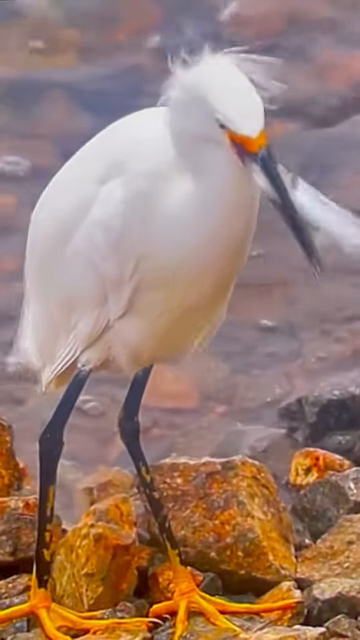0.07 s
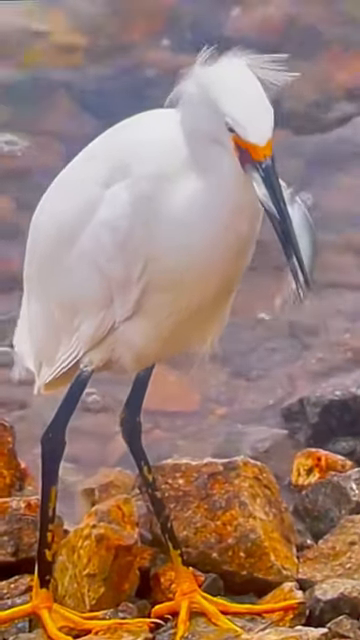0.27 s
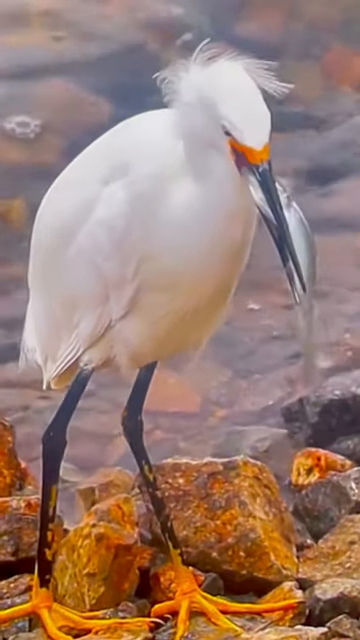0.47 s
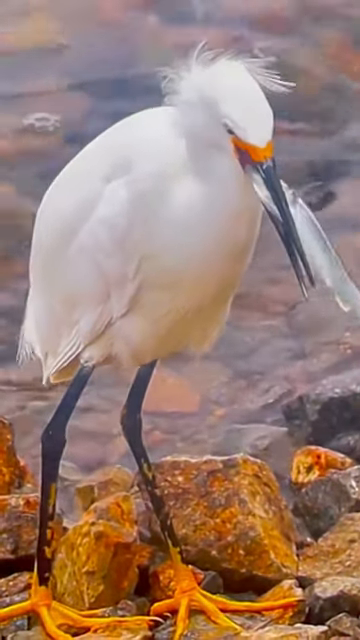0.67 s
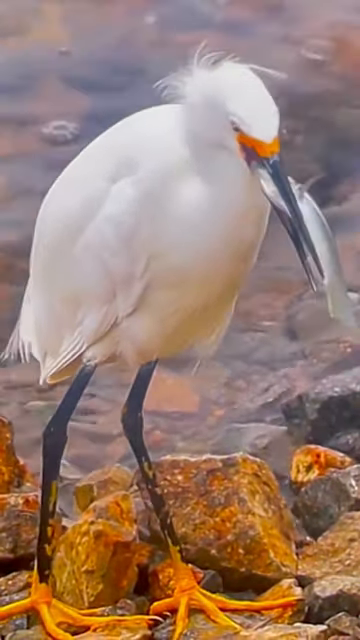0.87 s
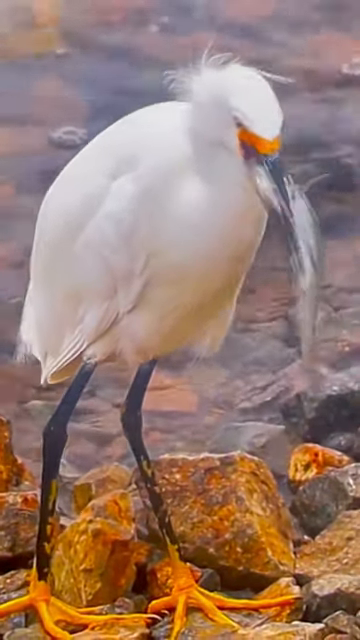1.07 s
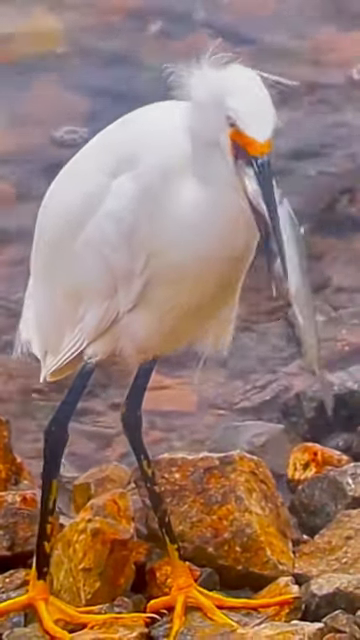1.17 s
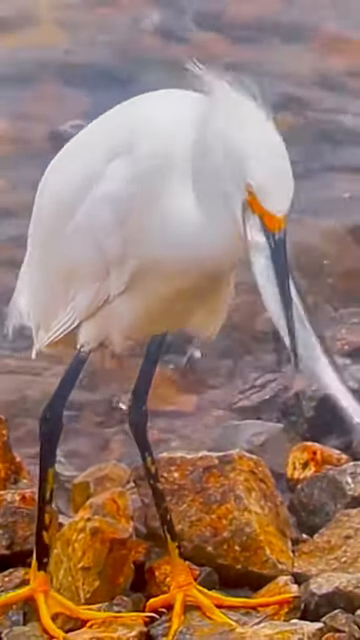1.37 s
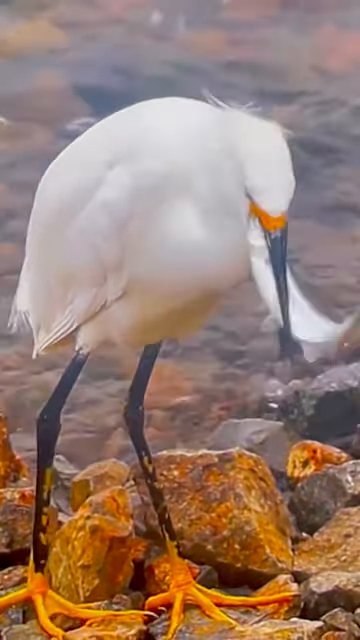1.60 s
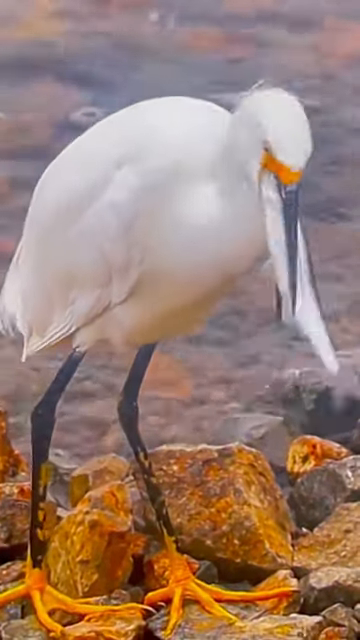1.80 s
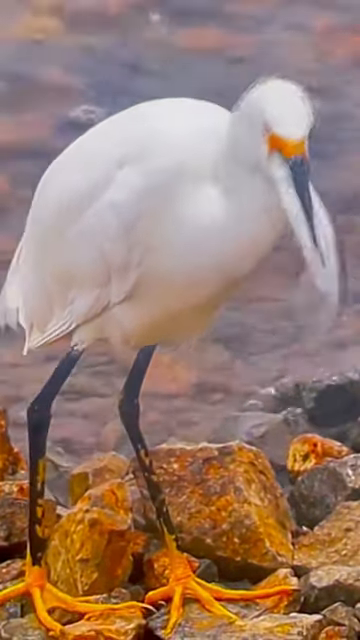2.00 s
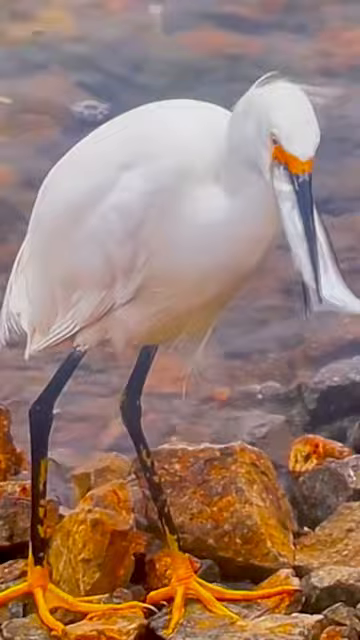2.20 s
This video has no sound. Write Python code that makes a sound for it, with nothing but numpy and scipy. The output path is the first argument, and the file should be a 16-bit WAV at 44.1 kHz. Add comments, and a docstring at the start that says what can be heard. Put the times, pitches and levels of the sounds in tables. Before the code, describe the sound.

One brief, raspy egret croak, with ripples splashing softly along a rocky shore.

```python
"""Ripples wash and splash over stones at a rocky water's edge, with faint wind on the microphones.
An egret gives one short, harsh croak: uneven pulses and puffs of air ring its throat, and the rocks
scatter a faint echo. The recorder's gain control ducks the wash's midrange after the croak, then lets
it recover. Its stereo processing widens one sound, putting parts of the treble out of phase."""
import sys
import numpy as np
from scipy import signal
from scipy.fft import rfft, irfft
from scipy.io import wavfile
from scipy.ndimage import uniform_filter1d, map_coordinates

SR = 44100
rng = np.random.default_rng(int(sys.argv[2]) if len(sys.argv) > 2 else 0)


def store_pcm(level_fs):
    """Save levels as 16-bit WAV."""
    pcm = np.round(np.clip(level_fs, -1, 1) * 32767).astype(np.int16)
    wavfile.write(sys.argv[1], SR, np.atleast_2d(pcm).T)


N = 99225

# spectrum of the wash on the stones: f/Hz, relative level/dB
WASH_SPECTRUM = [(30, -22.5), (200, -25), (350, -13.5), (570, -10.5), (740, -16.5), (950, -3.5),
                 (1100, 0.5), (1400, -6), (1800, -0.5), (2050, -6.5), (2400, -18), (2900, -20.5),
                 (3400, -16.5), (3850, -31), (4600, -30), (5050, -42), (5550, -25), (6100, -23),
                 (7000, -31.5), (8200, -26), (8650, -38), (9400, -29.5), (10050, -29.5), (10500, -28),
                 (11400, -31.5), (12200, -56)]
# the wash's midrange as the recorder's gain control ducks it and lets it recover: t/s, level/dB
WASH_DUCKING = [(0, -33), (.22, -33.5), (.45, -46.5), (.52, -43), (.72, -44), (.8, -39), (1.1, -37.5),
                (1.45, -36), (1.55, -34.5), (1.77, -34), (1.88, -34.5), (2.25, -34)]
# edge below which the wash thins out: t/s, f/Hz
WASH_LOW_EDGE = [(0, 30), (1.62, 40), (1.78, 300), (1.92, 304), (2.03, 503), (2.15, 670), (2.25, 560)]
# wind rumble common to both microphones: f/Hz, relative level/dB
WIND_SPECTRUM = [(15, -43), (28, -18), (40, -15.5), (52, -4), (75, -12.5), (130, -12), (250, -30),
                 (600, -75)]
# wind rumble that differs between the microphones: f/Hz, relative level/dB
EDDY_SPECTRUM = [(15, -19), (50, -11), (130, 1), (300, 11), (500, 3), (1000, -43)]
# gusts at the microphones: t/s, level/dB
GUST_LEVEL = [(0, -58), (.2, -65.5), (.7, -70), (1.2, -65), (1.55, -62), (1.75, -74), (1.9, -64),
              (2.03, -75), (2.25, -70)]
# resonances of the egret's throat and bill: f/Hz, relative level/dB
THROAT_SPECTRUM = [(300, -41.5), (720, -39), (950, -13.5), (1100, -16), (1420, -14.5), (1750, -2.5),
                   (2020, 0.5), (2250, -10), (2430, -17.5), (2640, -31), (2920, -15), (3150, -20.5),
                   (3400, -19.5), (3650, -31), (3950, -42), (4750, -32.5), (5100, -40), (5800, -29),
                   (6600, -37.5), (7200, -47), (9000, -73)]
# glide of the croak: t/s, pitch/Hz, factor on the throat's resonance frequencies
CROAK_GLIDE = [(.23, 235, 0.99), (.255, 256.7, 0.988), (.28, 275.2, 0.987), (.305, 287.2, 1.006),
               (.33, 314.6, 0.978), (.355, 331.9, 1.03), (.39, 361.5, 0.996), (.41, 354.8, 1.023),
               (.44, 298.4, 0.954)]
# voicing of the croak: t/s, effort/dB, treble gain/dB, roughness (0-1), clean harmonics/dB re voice
CROAK_VOICING = [(.234, -20, 2, 1, -22), (.243, -22.5, 4, 0.4, -13), (.284, -22, 4, 0.6, -9.5),
                 (.305, -19, -0.5, 0.3, -13.5), (.34, -21.5, -0.5, 0, -7.5),
                 (.367, -17.5, -3.5, 0.65, -15.5), (.40, -22.5, 1.5, .65, -15.5),
                 (.432, -21.5, -10.5, 1, -17), (.441, -25, -2, 0.7, -10)]
# larger splashes: t/s, peak level/dB, centre f/Hz
SPLASH_EVENTS = [(.785, -29.5, 1484), (1.134, -29.5, 1350), (1.148, -29, 1166), (1.328, -24, 1193),
                 (1.369, -26, 1714), (1.496, -24, 1370), (1.597, -30, 1340), (1.672, -29.5, 1773),
                 (1.766, -28, 1550), (1.929, -22.5, 1593), (2.126, -25, 1570)]
# phase twist of the recorder's stereo processing: f/Hz, lead of the left/rad
STEREO_PHASE = [(0, 0), (600, -.3), (950, 0), (2000, 0), (2600, .65), (4100, .7), (4600, 1.7), (4950, 3.2),
                (5250, 5.5), (5700, 6.25), (6200, 6.3), (8500, 9.4), (9500, 9.45), (11500, 11.6),
                (12000, 12.6)]
# balance between the channels: f/Hz, left minus right/dB
STEREO_BALANCE = [(350, 0), (750, -2), (1400, -2.3), (1700, -.2), (2100, 0)]


def amp(db):
    """Decibels to gain."""
    return 10 ** (np.asarray(db) / 20)


def unit(x):
    """Scales to rms 1."""
    return x / np.sqrt(np.mean(x ** 2) + 1e-20)


def bell(offset, width):
    """Gaussian curve of height 1."""
    return np.exp(-(offset / width) ** 2 / 2)


def at_hz(points, hz):
    """Reads a spectrum on a log-frequency axis."""
    f, value = np.transpose(points)
    return np.interp(np.log(hz + 1), np.log(f + 1), value)


def at_time(points, t):
    """Reads every column of a control curve."""
    times, *columns = np.transpose(points)
    return [np.interp(t, times, c) for c in columns]


def colour(x, spectrum):
    """Minimum-phase filter with the given spectrum."""
    hz = abs(np.fft.fftfreq(4096, 1 / SR))
    log_gain = np.log(amp(at_hz(spectrum, hz)))
    response = np.exp(np.conj(signal.hilbert(log_gain)))
    taps = np.fft.ifft(response).real[:2048]
    return signal.fftconvolve(x, taps)[:len(x)]


def wander(hz):
    """Smooth random motion of rms 1, rolling off above the given rate."""
    lowpass = bell(np.fft.rfftfreq(N, 1 / SR), hz)
    return unit(irfft(rfft(rng.standard_normal(N)) * lowpass, N))


def ripples(drops_per_s=600, hiss_db=-38.5, body_hz=1610):
    """A patchy wash with tiny drops; a set curve for the recorder's gain control ducks its midrange."""
    sizes = amp(3.5 * np.minimum(rng.exponential(1, N), 4)) * rng.choice([-1, 1], N)
    drops = unit(sizes * (rng.random(N) < drops_per_s / SR))
    wash = unit(colour(rng.standard_normal(N) + amp(-7) * drops, WASH_SPECTRUM))
    hz, t, frames = signal.stft(wash, SR, nperseg=512, noverlap=384)
    hz, frames = hz + 1, frames.T
    midrange_db = at_time(WASH_DUCKING, t)[0][:, None]
    edge_hz = at_time(WASH_LOW_EDGE, t)[0][:, None]
    duck_share = 0.27 + 0.73 * bell(np.log2(hz / body_hz), 0.42)
    patches = uniform_filter1d(rng.standard_normal(frames.shape), size=8, axis=0)
    patches = unit(uniform_filter1d(patches, size=7, axis=1))
    flicker = unit(uniform_filter1d(rng.standard_normal(len(t)), size=4))[:, None]
    level_db = hiss_db + duck_share * (midrange_db - hiss_db) + 1.1 * patches + .5 * flicker
    low_cut = np.maximum(1 / np.sqrt(1 + (edge_hz / hz) ** 9), amp(-12))
    frames = frames * amp(level_db) * low_cut
    return signal.istft(frames.T, SR, nperseg=512, noverlap=384)[1][:N]


def wind(eddy_db=-10):
    """Faint low buffeting, nearly alike in both microphones."""
    common = unit(colour(rng.standard_normal(N), WIND_SPECTRUM))
    eddies = unit(colour(rng.standard_normal(N), EDDY_SPECTRUM))
    gusts = amp(at_time(GUST_LEVEL, np.arange(N) / SR)[0])
    return gusts * (common + amp(eddy_db) * np.array([eddies, -eddies]))


def throat_snap(start_s, peak_db=-13.5):
    """The egret's throat snaps open and rings once."""
    ring = colour(signal.unit_impulse(N, round(start_s * SR)), THROAT_SPECTRUM)
    return amp(peak_db) * ring / abs(ring).max()


def throat(drive, stretch):
    """Throat and bill filter the drive on a stretched clock, so all their resonances move together."""
    clock = np.cumsum(stretch)
    positions = np.interp(np.arange(int(clock[-1])), clock, np.arange(len(drive)))
    stretched = map_coordinates(drive, [positions], order=3)
    return map_coordinates(colour(stretched, THROAT_SPECTRUM), [clock], order=3)


def croak(start_s, end_s, catch_s, jitter_s=.0001, shimmer_db=2, rattle_db=1.8):
    """Uneven pulses and puffs of air ring the throat; the pitch climbs, then sags."""
    t = np.arange(N) / SR
    pitch, stretch = at_time(CROAK_GLIDE, t)
    effort_db, treble_db, rough, clean_db = at_time(CROAK_VOICING, t)
    cycles = np.cumsum(pitch) / SR
    uneven = cycles + pitch * jitter_s * wander(300)
    beats = np.diff(np.floor(np.maximum.accumulate(uneven)), prepend=0)  # one impulse per cycle
    pulses = unit(beats * amp(shimmer_db * wander(280)))
    puffs = unit(np.exp(-(uneven % 1) / 0.74) * rng.standard_normal(N))
    rattle = amp(rattle_db * rough * wander(130))
    drive = (np.sqrt(1 - rough) * pulses + np.sqrt(rough) * puffs) * rattle
    voice = throat(drive, stretch)
    voice /= np.sqrt(uniform_filter1d(voice ** 2, size=900) + 1e-12)  # level held even over 20 ms
    treble = signal.sosfiltfilt(signal.butter(6, 2560, "high", fs=SR, output="sos"), voice)
    voice += (amp(treble_db) - 1) * treble
    # the lowest resonance, near 1060 Hz, picks out clean harmonics
    clean = sum(bell(k * pitch - 1060, 151) * np.cos(2 * np.pi * k * cycles) for k in range(3, 6))
    voice += amp(clean_db) * np.sqrt(2) * clean
    gate = np.clip((t - start_s) / .001, 0, 1) * np.clip((end_s - t) / .002, 0, 1)
    catch_db = -9 * bell(t - catch_s, .0014)  # the voice catches briefly
    return gate * amp(effort_db + catch_db) * voice


def rock_echo(x, level_db=-12.5, t60_s=0.18):
    """A short, faint scatter from nearby rocks, starting 4 ms behind the direct sound."""
    t = np.arange(SR // 2) / SR
    tail = rng.standard_normal(len(t)) * amp(-60 * t / t60_s) * (t > .004)
    return amp(level_db) * signal.fftconvolve(x, tail / np.linalg.norm(tail))[:N]


def splashes(decay_s=.0014):
    """Each larger splash is a brief burst of six small bubbles around one pitch."""
    out, t = np.zeros(N), np.arange(SR // 30) / SR
    envelope = (t / decay_s) ** 2 * np.exp(-t / decay_s)
    for peak_s, peak_db, centre_hz in SPLASH_EVENTS:
        spread, phase = rng.uniform(-0.96, 1, (2, 6, 1))
        bubble_hz = centre_hz * np.exp(.22 * spread)
        burst = envelope * np.sin(2 * np.pi * (bubble_hz * t + phase)).sum(0)
        start = round((peak_s - 2 * decay_s) * SR)
        out[start:start + len(t)] += (amp(peak_db) * burst / abs(burst).max())[:N - start]
    return out


def stereo_widening(x):
    """The recorder's stereo processing widens one sound, putting parts of the treble out of phase."""
    hz = np.fft.rfftfreq(2 * N, 1 / SR)
    lead = np.interp(hz, *np.transpose(STEREO_PHASE))
    left = amp(at_hz(STEREO_BALANCE, hz) / 2) * np.exp(.5j * lead)  # half the difference per side
    return irfft(rfft(x, 2 * N) * np.array([left, 1 / left]))[:, :N]


def scene():
    """Water, wind and one egret, heard from the rocky shore."""
    call_s = .2325
    egret = throat_snap(call_s) + croak(call_s, end_s=.441, catch_s=.2385)
    return stereo_widening(egret + rock_echo(egret) + ripples() + splashes()) + wind()


def record(dry, cutoff_hz=12300):
    """The recorder's band limit."""
    lowpass = signal.firwin(511, cutoff_hz, window=("kaiser", 9), fs=SR)
    return signal.oaconvolve(dry, lowpass[None], "same")


dry = scene()
out = record(dry)
store_pcm(out)
```